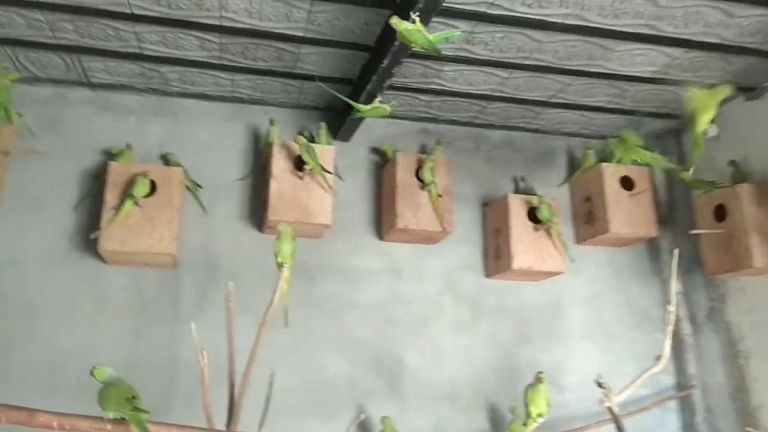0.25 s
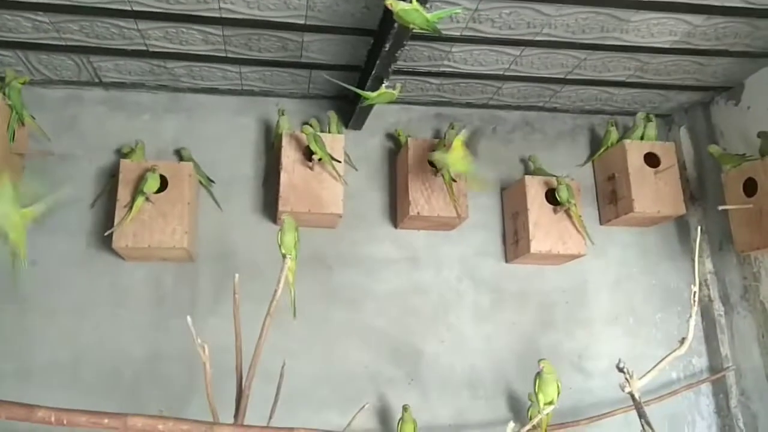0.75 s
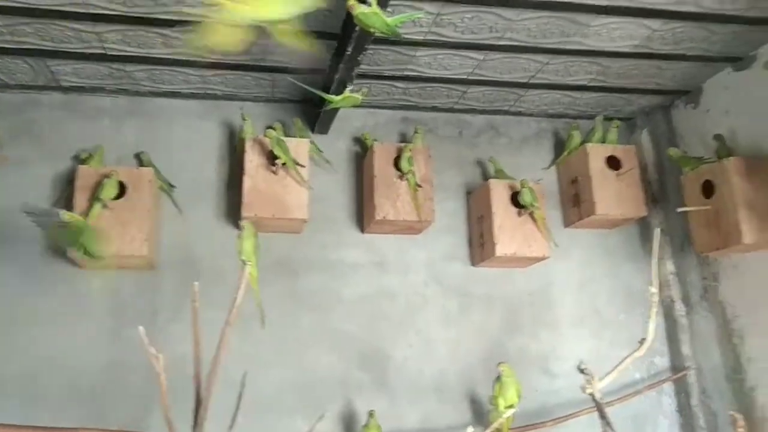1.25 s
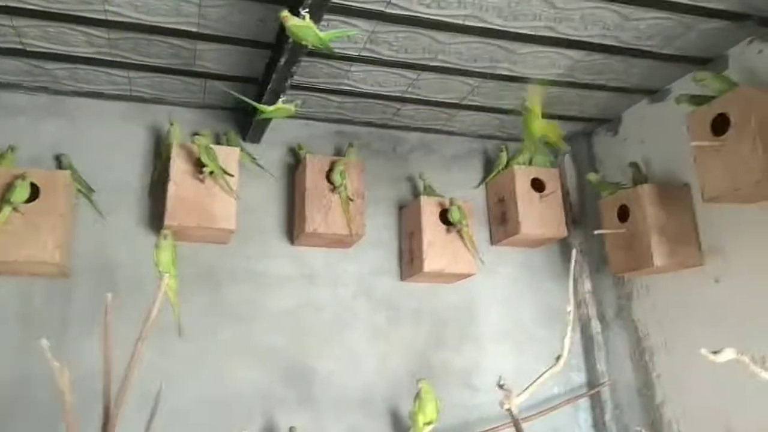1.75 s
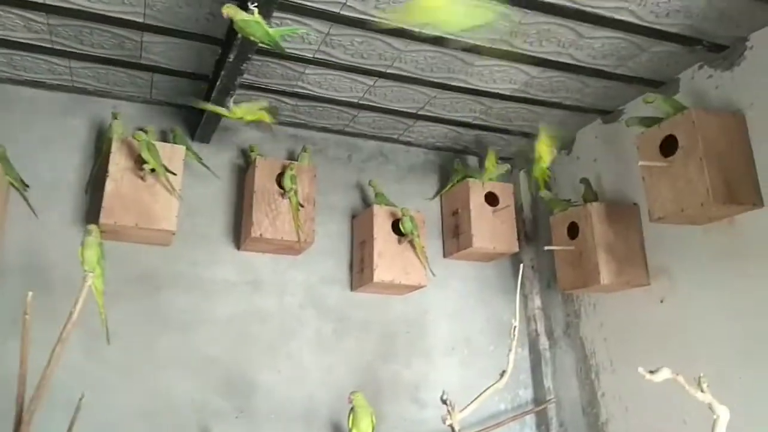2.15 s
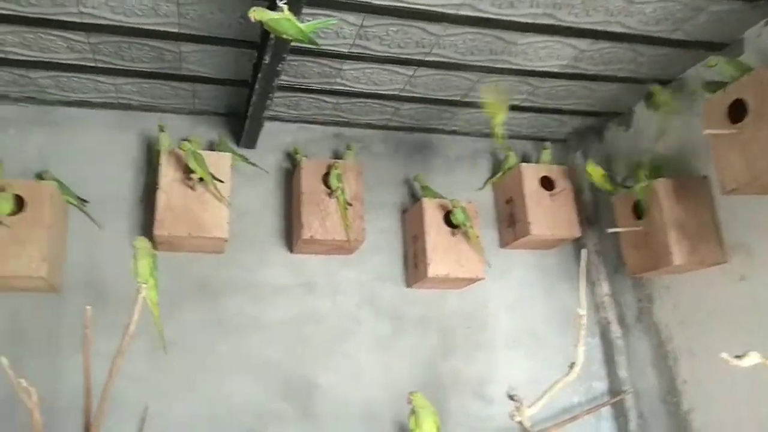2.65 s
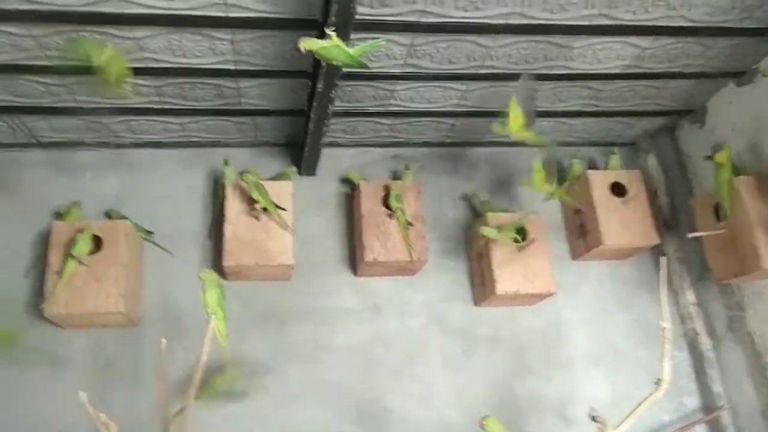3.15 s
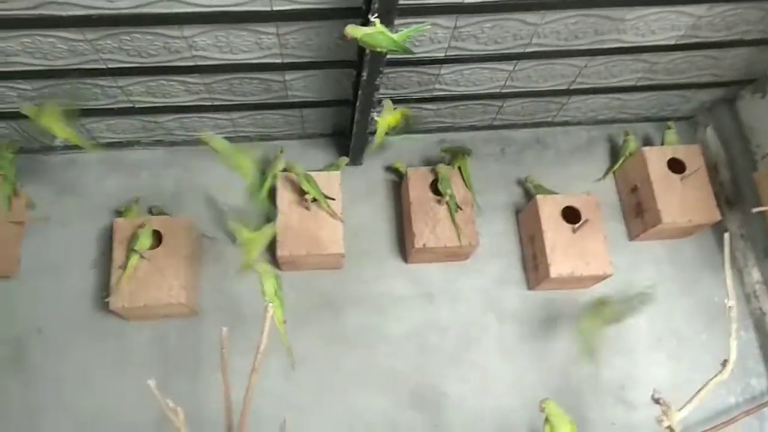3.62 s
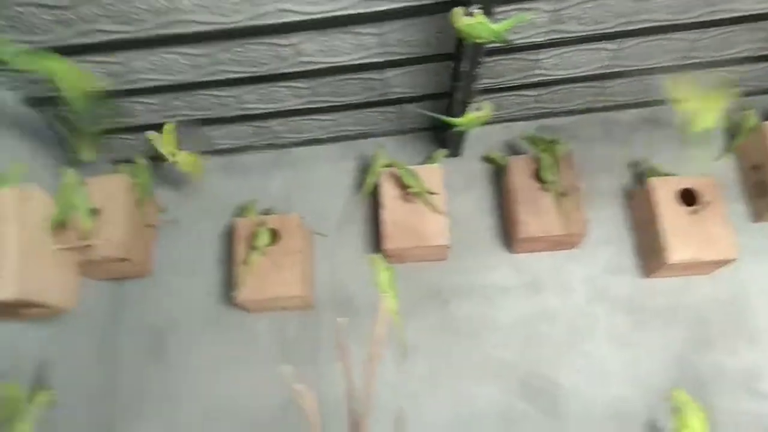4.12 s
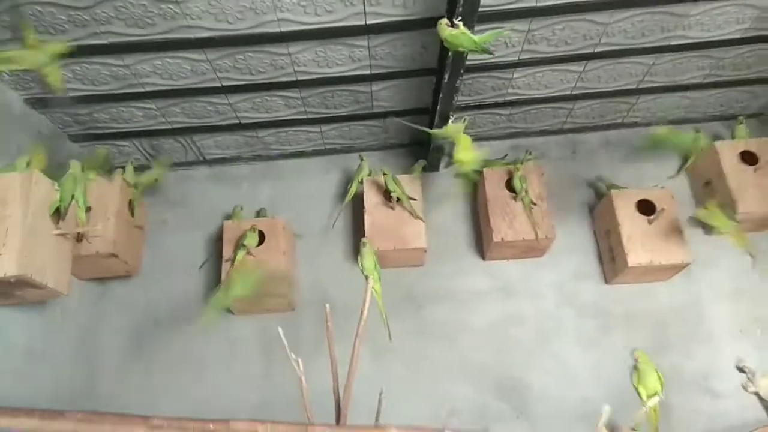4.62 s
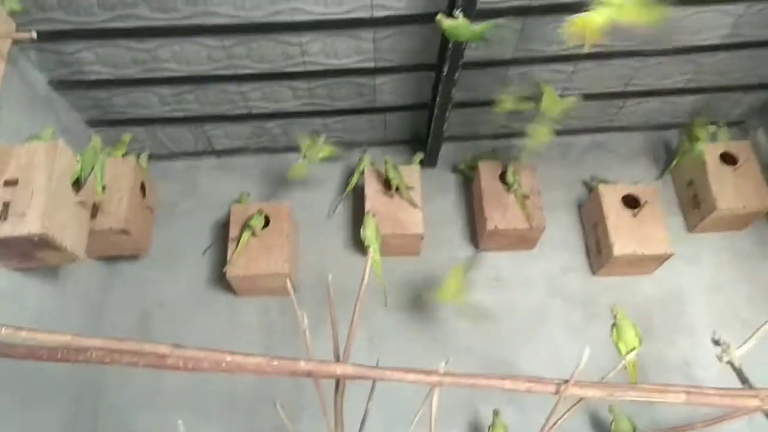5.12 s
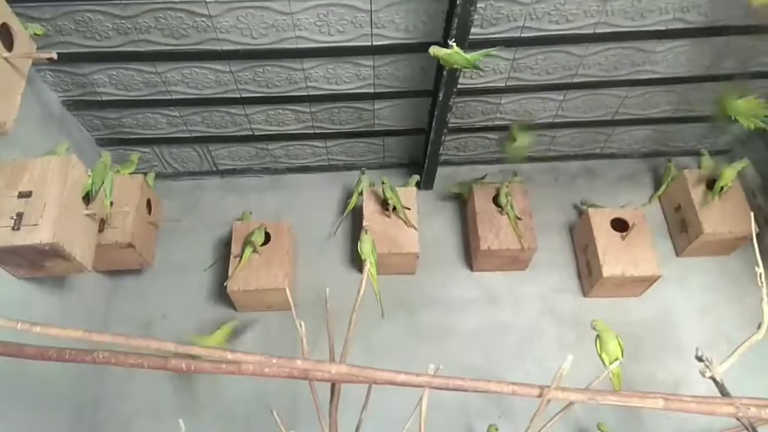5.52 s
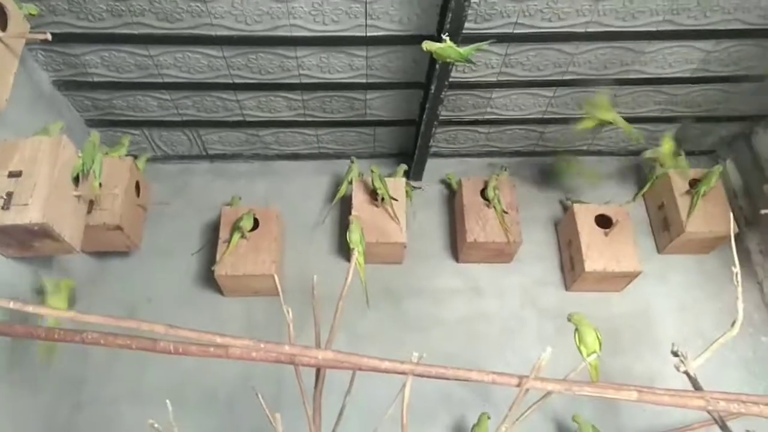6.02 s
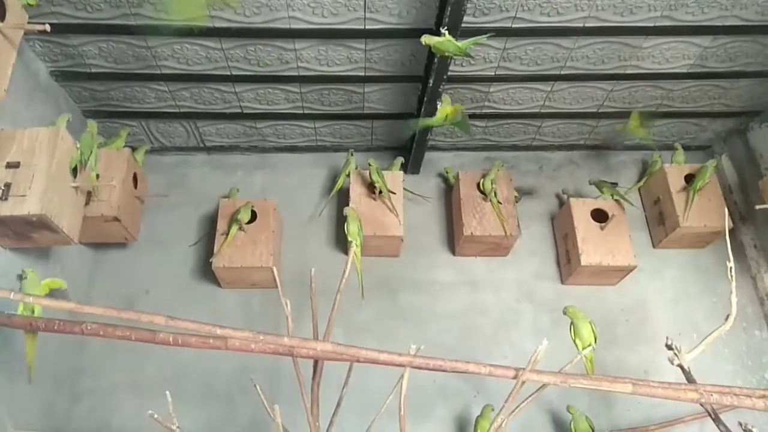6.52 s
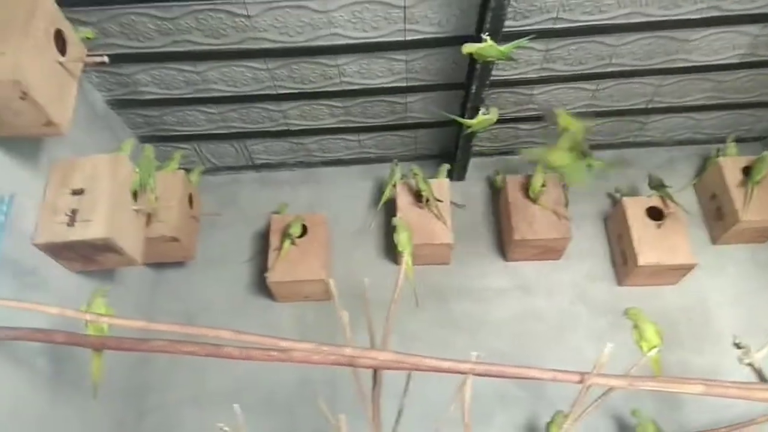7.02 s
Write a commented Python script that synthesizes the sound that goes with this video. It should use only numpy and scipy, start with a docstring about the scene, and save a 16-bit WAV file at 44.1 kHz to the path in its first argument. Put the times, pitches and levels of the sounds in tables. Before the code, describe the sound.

Piercing, raspy parakeet squawks repeat in quick succession, giving way to fluttering wingbeats, a lull, and a few last shrill calls.

```python
"""Parakeets screech in a quick bout inside a hard-walled aviary with a sheet roof, with some plain whines.
Each screech rasps upward, holds a piercing note and breaks into a harsh fall; the room rings after it.
From about 3 s wingbeats of puffed air and brushing feathers swell up, under a few more screeches at 4 s.
The wings have the lull to themselves until a second, shorter bout of screeches and whines near the end.
Voices are unsteady harmonics, with rasping noise in the screeches; wings, air and echoes are shaped noise."""
import sys
import numpy as np
from scipy import signal
from scipy.fft import rfft, irfft, next_fast_len
from scipy.io import wavfile
from scipy.ndimage import uniform_filter1d, minimum_filter1d

SR = 44100
rng = np.random.default_rng(int(sys.argv[2]) if len(sys.argv) > 2 else 0)


def master_out(mix):
    """Clip the mix to full scale and print it as 16-bit PCM to the path in sys.argv[1]."""
    frames = np.transpose(np.atleast_2d(mix))
    ceiling = np.clip(frames, -1, 1)
    pcm = np.round(ceiling * 32767).astype(np.int16)
    wavfile.write(sys.argv[1], SR, pcm)


N = 320607
TIME = np.arange(N) / SR


def amp(db):
    """Turns decibels into a gain."""
    return 10 ** (np.asarray(db) / 20)


def evened(x):
    """Scales a sound to rms 1."""
    return x / np.sqrt(np.mean(x ** 2) + 1e-20)


def read(points, hz):
    """Reads a curve joined by straight lines on a log frequency axis."""
    f, value = np.transpose(points)
    return np.interp(np.log(hz + 1), np.log(f + 1), value)


def level(rows):
    """Gain at every sample from (time [s], level [dB]) rows."""
    return amp(np.interp(TIME, *np.transpose(rows)))


def coloured(x, points):
    """Filters x by a spectrum curve and evens it to rms 1."""
    n = x.shape[-1]
    gains = amp(read(points, np.fft.rfftfreq(n, 1 / SR)))
    return evened(irfft(rfft(x) * gains, n))


def wobble(n, hz):
    """Random wandering: noise rolled off above a rate, about rms 1."""
    size = next_fast_len(n, real=True)
    f = np.fft.rfftfreq(size, 1 / SR)
    slow = rfft(rng.standard_normal(size)) / (1 + (f / hz) ** 4)
    return evened(irfft(slow, size))[:n]


def add(mix, s, sound):
    """Mixes a sound in at a time in seconds, cut off at the end of the scene."""
    part = mix[:, round(s * SR):][:, :sound.shape[-1]]
    part += sound[..., :part.shape[1]]


def placed(x, side_db):
    """Pans by level and arrival time: the further left, the louder and sooner on the left."""
    lead = 0.00008 * (side_db + 0.9)  # seconds each way; arrivals coincide at -0.9 dB
    hz = np.fft.rfftfreq(len(x), 1 / SR)
    turn = np.exp(2j * np.pi * hz * np.array([[lead], [-lead]]))
    return irfft(rfft(x) * turn, len(x)) * amp([[side_db / 2], [-side_db / 2]])


def air_noise(points):
    """Stereo noise of a given spectrum, alike in the bass and nearly independent in the treble."""
    # how alike left and right are: (frequency [Hz], likeness [0-1])
    likeness = [(30, .7), (120, 0.99), (270, 0.96), (500, 0.81), (1000, 0.07), (8000, 0.072)]
    size = next_fast_len(N, real=True)
    hz = np.fft.rfftfreq(size, 1 / SR)
    a, b = rfft(rng.standard_normal((2, size))) * amp(read(points, hz))
    same = np.clip(read(likeness, hz), -1, 1)
    right = same * a + np.sqrt(1 - same ** 2) * b
    return evened(irfft(np.array([a, right]), size)[:, :N])


def still_air(level_db=-49.5):
    """The steady, faint noise of still air under everything."""
    # spectrum of the still air: (frequency [Hz], relative density [dB per Hz])
    air_spectrum = [(25, -21), (70, -7), (130, -1), (270, 6), (600, -13), (1500, -26.5), (4000, -3.5),
                    (9000, -4.5), (16000, -5)]
    return amp(level_db) * air_noise(air_spectrum)


def wings(beat_hz=13, sharp=0.64, puff_db=-1.0, swish_db=-1.0, count=3):
    """Several birds beat out of step; each downstroke gives a puff of air and a swish of feathers."""
    # air pushed by the wings, most while the flock is up: (time [s], level before trim [dB])
    flapping = [(0, -50), (.25, -41), (.5, -48), (.8, -42.5), (1.15, -46.5), (2.3, -42), (2.95, -47.5),
                (3.22, -34.5), (5, -32.5), (5.3, -37), (6.15, -37), (6.42, -45), (6.95, -41), (7.27, -45.5)]
    # feathers brushing: (time [s], level before trim [dB])
    feathers = [(0, -55), (2.9, -44), (3.3, -31.5), (3.6, -36), (4.55, -31.5), (4.78, -37.5), (5.05, -32),
                (5.17, -47), (5.72, -49), (5.89, -35.5), (6.15, -58), (6.3, -73), (6.44, -44), (6.63, -61)]
    # hard wing strokes at take-off and landing: (time [s], thump [dB], feather slap [dB], decay [s])
    strokes = [(.82, -43, -48, 0.043), (1.269, -41.5, -35, 0.084), (1.72, -47, -48, 0.023),
               (2.13, -62, -53, 0.03), (2.531, -34, -50, 0.032), (2.8, -38.5, -50, 0.087),
               (2.946, -40, -25.5, 0.01), (4.44, -42, -27, 0.021), (5.02, -47, -55, 0.012),
               (5.213, -66, -32, 0.053), (5.5, -61, -47.5, 0.06), (6.06, -45, -43.5, 0.03),
               (6.204, -38, -66, .012), (6.251, -60, -48.5, 0.035)]
    # spectrum of the pushed air: (frequency [Hz], relative density [dB per Hz])
    puff_spectrum = [(25, -48), (55, -32), (85, -24.5), (110, -13), (130, -9), (155, -10.5), (200, -5.5),
                     (225, -5), (270, 1.5), (330, -3.5), (450, -7), (700, -10), (950, -17.5), (1500, -50),
                     (3000, -98)]
    # spectrum of the feathers: (frequency [Hz], relative density [dB per Hz])
    swish_spectrum = [(410, -32), (700, -10), (767, -5.5), (1470, -9.5), (1680, -11), (3540, -11),
                      (4190, -11.5), (5170, -13), (13200, -14.5), (15900, -18)]

    beats = 0
    for bird in range(count):
        rate = beat_hz * (1 + 0.149 * wobble(N, hz=1.92))
        turns = np.cumsum(rate) / SR + rng.random()
        beats = beats + np.exp(sharp * np.cos(2 * np.pi * turns))
    beats = evened(np.sqrt(beats))
    push = amp(puff_db) * level(flapping) * beats
    brush = amp(swish_db) * level(feathers) * beats

    for s, thump_db, slap_db, decay in strokes:
        age = np.maximum(TIME - s, 0)
        stroke = np.minimum(age / 0.0052, 1) * np.exp(-age / decay)  # 5.2 ms attack
        push = push + amp(thump_db) * stroke
        brush = brush + amp(slap_db) * stroke
    return push * air_noise(puff_spectrum), brush * air_noise(swish_spectrum)


def whine(row, jitter=0.174, glide_bend=0.72, size=16384):
    """A plain call of two harmonics, gliding fastest at its start because the bend is under 1."""
    s, length, first, last, db, second_db, rough = row
    u = np.minimum(np.arange(size) / SR / length, 1)  # progress through the call
    glide = first + (last - first) * u ** glide_bend
    pitch = glide * (1 + jitter * rough * wobble(size, hz=249))
    angle = 2 * np.pi * np.cumsum(pitch) / SR
    voice = evened(np.sin(angle) + amp(second_db) * np.sin(2 * angle))
    swell = np.sqrt(abs(np.sin(np.pi * u)))
    return s, amp(db) * swell * voice


def screech(row, jitter=0.0497, least_jitter=0.0123, flutter=0.69, flutter_hz=260,
            rise_jitter=0.427, shut_db=-14, size=9216):
    """The syrinx starts with a rasp, locks into a clear note while the pitch holds, and frays on the way down."""
    # the highest notes take longest to reach: (top pitch [Hz], rise time [s])
    rise_times = [(1700, .03), (2350, .028), (2740, .046)]
    # windpipe and open beak, favouring harmonics near 3-5 kHz: (frequency [Hz], gain [dB])
    throat = [(1000, -9), (1800, -16.5), (2300, -8), (2700, 3), (3300, 2), (4600, 1.5), (5300, -4.5),
              (6000, -8.5), (7000, -10), (8000, -11), (9200, -14), (11300, -16.5), (13000, -24.5),
              (16000, -30)]
    # odd harmonics are weakest for notes near 1.7-1.9 kHz: (top pitch [Hz], odd-harmonic gain [dB])
    odd_gain = [(1300, -5.5), (1680, -23), (1850, -25), (2250, -1), (2700, 2.5)]
    # spectrum of the rasp: (frequency [Hz], relative density [dB per Hz])
    rasp_spectrum = [(300, -33), (1000, -15.5), (1400, -17.5), (1800, -5.5), (2300, -2.5), (3200, 0.5),
                     (4300, 3), (5400, -3.5), (6800, -7.5), (7900, -7), (9200, -2.5), (11000, -27.5),
                     (12500, -22.5), (16000, -11.5)]
    start_share, sag_per_s = 0.55, 1.1  # shares of the top pitch
    last_hz, usual_top_hz, last_follows = 1626, 2352, 0.41  # end of the fall; how far it follows the top
    attack_share, attack_bend = 0.73, 0.74  # level builds over this share of the rise, to this power of time
    rise_db, fall_db, release_s = -1, -0.5, 0.011  # levels against the held note
    rise_rough, fray = 1, 0.17  # roughness of the rise; roughness gained in the fall
    quaver, quaver_hz = 0.00784, 70  # tremble of the pitch, as a share of it
    fade_db, fade_hz = 3, 55  # each harmonic comes and goes on its own
    rasp_share = 0.82  # turbulent share of the power when roughest; the rest is harmonics

    s, hold, fall, top, db, swell_db, roughness, treble_db, side_db = row
    t = np.arange(size) / SR
    rise = read(rise_times, top)
    held, end = rise + hold, rise + hold + fall

    # pitch: a quick rise, a slowly sagging note, a fall
    last = last_hz * (top / usual_top_hz) ** last_follows
    sagged = top * (1 - sag_per_s * hold)
    pitch = np.interp(t, [0, rise, held, end], [start_share * top, top, sagged, last])
    pitch = uniform_filter1d(pitch, size=300)

    stages = [0.8 * rise, rise, held - hold / 10, held + fall / 2]
    rough = np.interp(t, stages, [rise_rough, roughness, roughness, roughness + fray])
    rough = np.clip(rough, 0, 1)
    attack = np.clip(t / (attack_share * rise), 0, 1) ** attack_bend
    gate = attack * np.clip((end - t) / release_s + 0.34, 0, 1)
    contour_db = np.interp(t, stages, [rise_db - swell_db / 2, 0, 0, fall_db + swell_db / 2])
    loud = gate * amp(db + contour_db)

    # unsteady cycles smear the harmonics into rough bands, the upper ones most
    cycle_rough = np.where(t < rise, np.minimum(rough, rise_jitter), rough)
    unsteady = (least_jitter + jitter * cycle_rough) * wobble(size, hz=468)
    tremble = quaver * wobble(size, hz=quaver_hz)
    turns = np.cumsum(pitch * (1 + unsteady + tremble)) / SR

    facing = [(4000, 0), (11000, treble_db)]  # a bird turned away sounds duller
    k = np.arange(1, 7)[:, None]  # harmonic numbers
    gains = amp(read(throat, k * pitch) + read(facing, k * pitch) + read(odd_gain, top) * (k % 2))
    fades = amp(fade_db * np.array([wobble(size, hz=fade_hz) for harmonic in k]))
    harmonics = fades * gains * np.cos(2 * np.pi * k * turns)
    note = evened(harmonics.sum(0) / np.sqrt((gains ** 2).sum(0)))

    # the rasp brightens as the beak opens
    rasp = coloured(coloured(rng.standard_normal(size), rasp_spectrum), facing)
    beak = np.minimum(t / rise, 1)
    rasp = beak * rasp + (1 - beak) * coloured(rasp, [(3000, 0), (9000, shut_db)])
    share = rasp_share * rough ** 1.7
    voice = np.sqrt(1 - share) * note + np.sqrt(share) * rasp

    # the membranes flap in uneven bursts
    depth = flutter * (rough + 0.14) / 2
    bursts = np.exp(depth * wobble(size, hz=flutter_hz) - depth ** 2)
    return s, placed(loud * bursts * voice, side_db)


def aviary(x, gap=0.00076, early_db=9, early_s=0.0079):
    """Dense echoes from plaster and roof: strong first ones, then a tail that dies band by band."""
    # reverberation of the room: (frequency [Hz], time to fall 60 dB [s])
    ring_times = [(150, 0.6), (500, 0.45), (1500, 0.71), (4000, 0.56), (9000, 0.51), (16000, 0.27)]
    hz, t, bands = signal.stft(rng.standard_normal((2, SR)), SR, nperseg=256)
    decay = amp(-60 * t / read(ring_times, hz)[:, None])
    tail = signal.istft(bands * decay, SR, nperseg=256)[1]
    age = np.arange(tail.shape[1]) / SR
    tail = tail * np.clip(age / gap - 1, 0, 1) * amp(early_db * np.exp(-age / early_s))
    tail = tail / np.linalg.norm(tail, axis=1, keepdims=True)
    return signal.fftconvolve(x, tail, axes=1)[:, :N]


def scene(direct_db=-4.0, room_db=1.22, swish_room_db=-5, count=5):
    """The birds are heard both directly and by way of the walls; each perch has its own echoes."""
    # one row a screech: (time [s], hold [s], fall [s], top pitch [Hz], level before the mix [dB],
    # swell from start to end [dB], roughness [0-1], treble [dB], left against right [dB])
    screeches = [ (0.133, 0.053, 0.024, 2500, -12, 2, 0.11, 3, 0),
                 (.343, 0.039, 0.041, 2360, -11, -0.5, 0.29, 3, 0),
                 (0.415, 0.062, 0.023, 1697, -15, 1, 0.63, -1, -2),
                 (0.572, 0.055, 0.053, 2345, -11.5, -8, 0.21, 3.5, 1),
                 (0.623, 0.059, 0.032, 1696, -13.5, 5.5, 0.59, -2, -2.5),
                 (0.826, 0.058, .055, 2343, -13, -6.5, 0.12, 0.5, .5),
                 (.89, 0.056, 0.062, 1670, -19.5, 4, 0.48, 1.5, -2.5),
                 (1.05, 0.061, 0.034, 2315, -12, 0.5, 0.03, 1.5, 0.5),
                 (1.274, 0.055, 0.033, 2288, -10.5, 0.5, 0, 4, 1),
                 (1.491, 0.059, 0.037, 2345, -11, -4.5, 0.03, 4.5, 1.5),
                 (1.715, 0.061, 0.038, 2336, -12, -1, 0.15, 4.5, 0.5),
                 (1.943, 0.069, 0.04, 2330, -11, -4.5, 0.13, 3.5, 0),
                 (2.302, 0.074, .022, 2350, -11.5, 5, 0.14, 2, 0),
                 (2.529, 0.1, .03, 1221, -18.5, -5, 0.84, -4.5, -4),
                 (2.539, 0.059, .025, 2352, -12.5, -4.5, 0.05, 3, -1.5),
                 (2.631, .04, 0.026, 1333, -22, -4, .35, -4, 1.5),
                 (2.708, 0.043, 0.033, 1662, -18.5, -10, 0.4, -17.5, -0.5),
                 (2.95, 0.043, 0.0062, 1866, -13.5, 13.5, 0, 9, -5),
                 (2.997, 0.049, 0.028, 2262, -14, 4.5, 0.53, 6, 0),
                 (3.695, .014, .043, 1792, -11, 0, 0.1, 4.5, -2),
                 (3.764, 0.029, 0.03, 2230, -17, -1, .43, 3, -1),
                 (3.923, 0.026, 0.028, 1674, -12, -7, 0.27, 3, -1.5),
                 (3.937, 0.036, 0.05, 2447, -20.5, 18.5, 0.26, 2, 1),
                 (4.146, .03, 0.064, 2442, -13, -1.5, 0.19, 1.5, -.5),
                 (6.701, 0.02, .056, 2706, -16.5, 9, 0.25, -1.5, -.5),
                 (6.8, .035, 0.0091, 1873, -17, 3, 0.3, -7, -0.5),
                 (6.92, 0.031, 0.058, 2655, -14, 4, 0.17, 0.5, -1),
                 (7.033, 0.021, .019, 1855, -19, 0, 0.15, -7, -1),
                 (7.207, .036, 0.036, 2473, -16.5, 5, 0.77, -2, -1)]
    # plain gliding calls, mostly soft, a few as loud as squawks: (time [s], length [s], first pitch [Hz],
    # last pitch [Hz], level before the mix [dB], second harmonic against first [dB], roughness [0-1])
    whines = [ (0.38, 0.084, 630, 720, -36, -1, 0.4), (0.444, 0.12, 1560, 1665, -36.5, -14, .35),
              (0.957, 0.23, 1370, 678, -37.5, 2.5, 0.65), (2.041, 0.29, 370, 580, -35.5, 4, 0.23),
              (2.519, 0.095, 607, 927, -27.5, 5, 0.65), (2.575, 0.1, 1620, 1620, -18.5, 17, .08),
              (2.619, .12, 1400, 1163, -22, 10.5, .31), (6.646, 0.057, 2550, 2283, -36, -8, 0),
              (7.07, .088, 2450, 2308, -22, -24, 0.12)]
    puffs, swishes = wings()
    flight = puffs + swishes + amp(swish_room_db) * aviary(swishes)

    calls = [screech(row) for row in screeches] + [whine(row) for row in whines]
    perches = np.zeros((count, 2, N))
    for k, call in enumerate(calls):
        add(perches[k % count], *call)
    flock = sum(amp(direct_db) * birds + amp(room_db) * aviary(birds) for birds in perches)
    return still_air() + flight + flock


def record(dry, ceiling=0.89, edge_hz=16000):
    """A fast limiter, shared by both channels, holds the loudest peaks down; then a low-pass."""
    allowed = np.minimum(1, ceiling / (abs(dry).max(0) + 1e-9))
    gain = uniform_filter1d(minimum_filter1d(allowed, size=200), size=200)  # windows in samples
    low_pass = signal.firwin(1023, edge_hz, window=("kaiser", 9), fs=SR)
    return signal.oaconvolve(dry * gain, low_pass[None], "same")


dry = scene()
out = record(dry)
master_out(out)
```